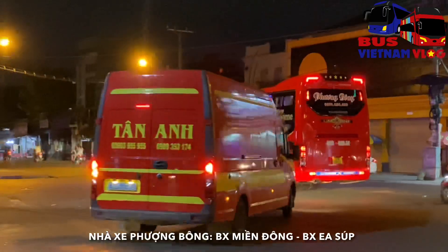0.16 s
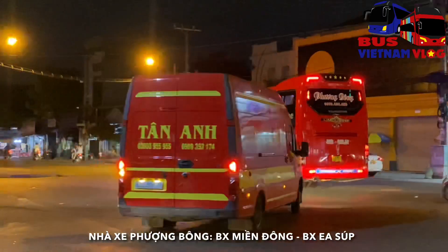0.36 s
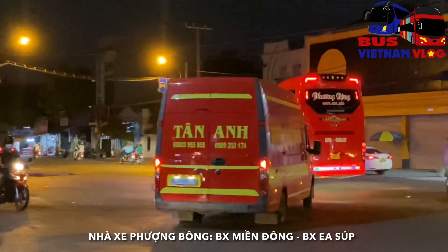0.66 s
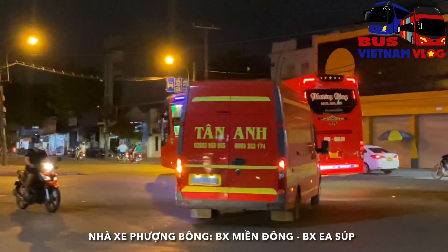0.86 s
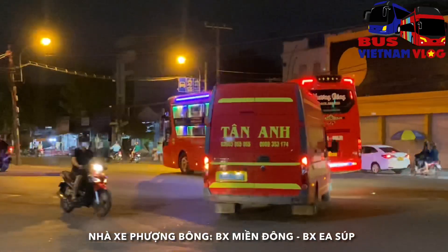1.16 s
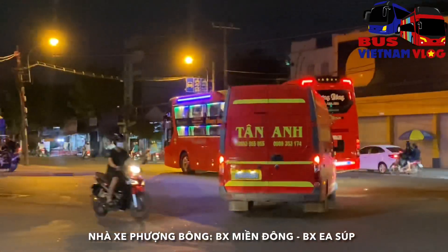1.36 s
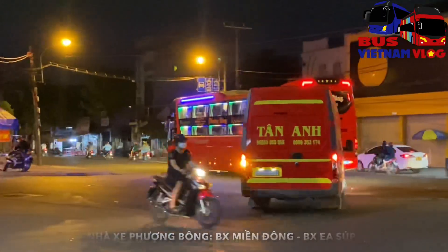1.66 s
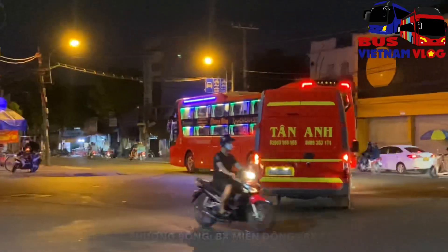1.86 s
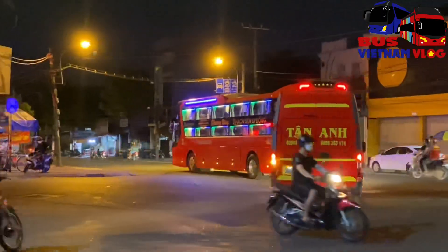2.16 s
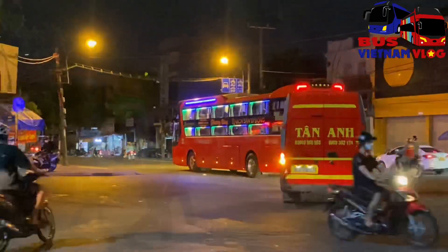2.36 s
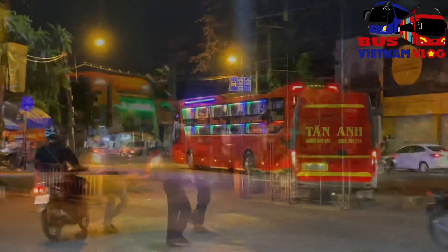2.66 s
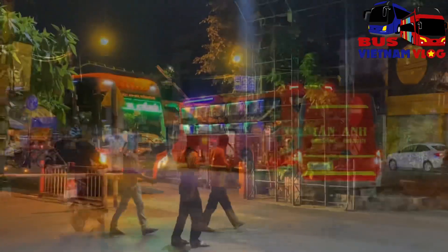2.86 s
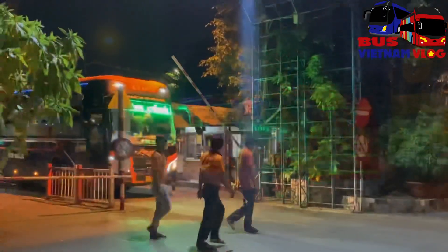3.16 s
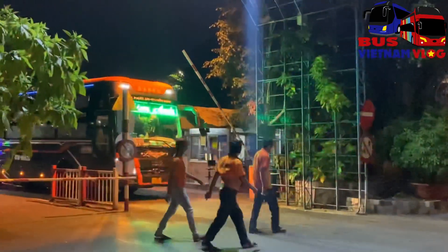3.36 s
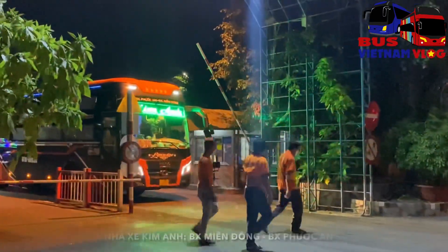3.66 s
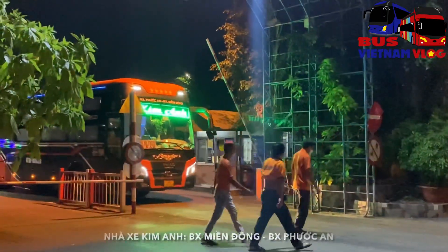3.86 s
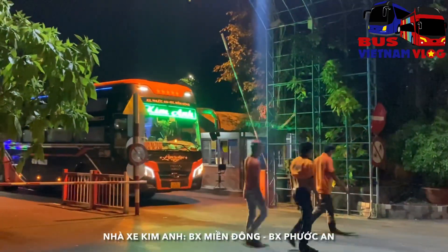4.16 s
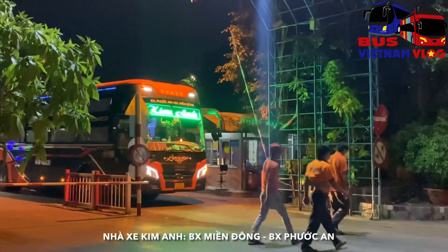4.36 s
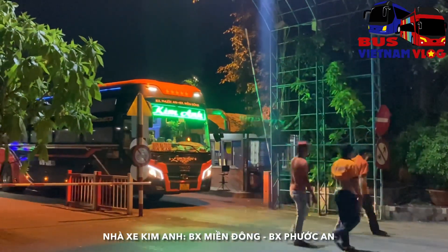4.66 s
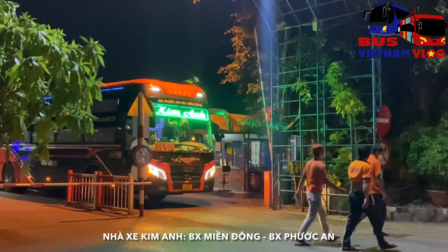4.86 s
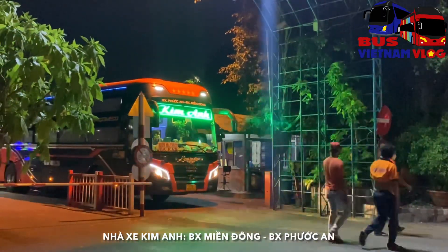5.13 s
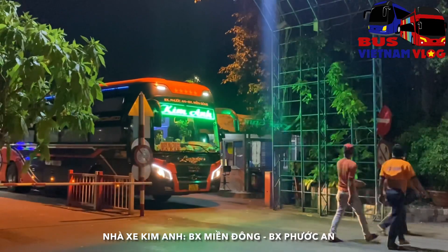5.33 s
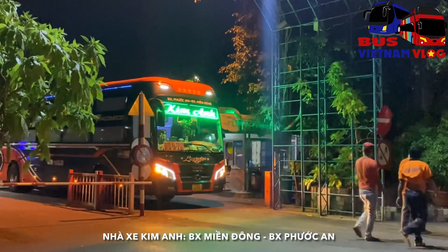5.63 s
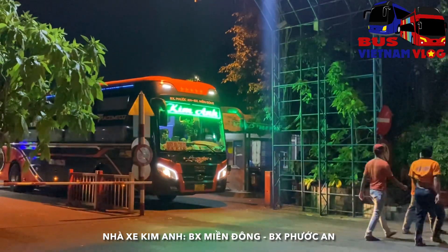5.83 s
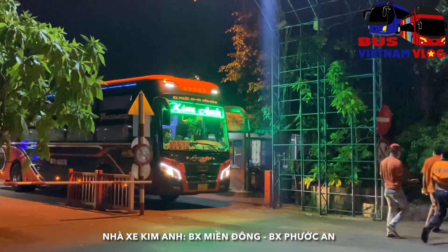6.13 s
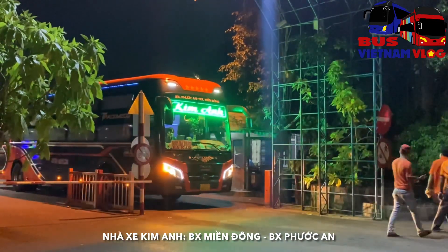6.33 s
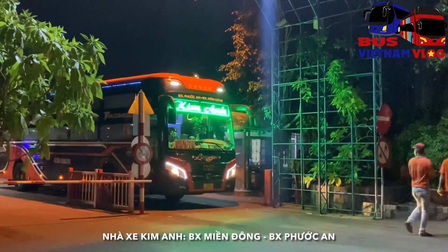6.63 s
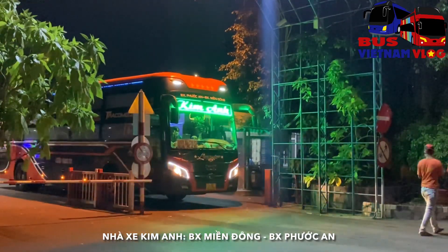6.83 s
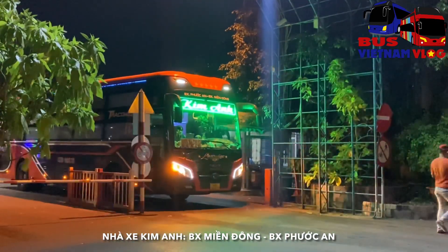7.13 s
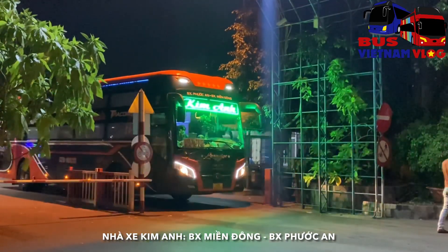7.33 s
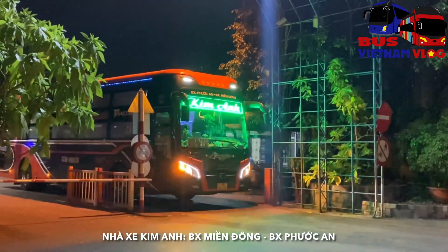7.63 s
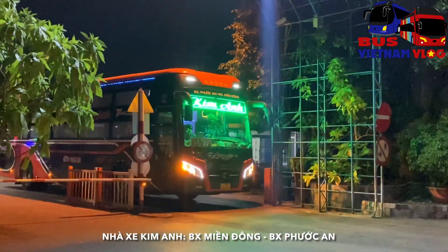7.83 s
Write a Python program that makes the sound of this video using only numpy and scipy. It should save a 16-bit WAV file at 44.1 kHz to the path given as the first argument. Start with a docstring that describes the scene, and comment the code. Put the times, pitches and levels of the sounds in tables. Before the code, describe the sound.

On a street by a bus station, a diesel van pulls away and a motorbike putters past over steady traffic rumble, with faint squeaks, sharp rattles and distant horn toots. The sound blends into a duller yard, where soft puffs of air escape and a coach creeps out, pulling, easing off and pulling again while another idles. Near the end, two shrill motorbike horns beep quickly with a slight echo.

```python
"""A bus station at night. In the street a diesel van crawls off and a motorbike putters past; the scene
fades to the gate, where a coach creeps out while another idles. Each engine hums because it fires many
times a second, and traffic rumbles, roars and hisses in both places. Horns toot far off, with a few ticks,
squeaks, whines and puffs of air in between. Near the end two shrill motorbike horns beep as their steel
discs buzz, and the house fronts echo them."""
import sys
import numpy as np
from scipy import signal
from scipy.fft import rfft, irfft, next_fast_len
from scipy.io import wavfile
from scipy.ndimage import uniform_filter1d

SR = 44100
rng = np.random.default_rng(int(sys.argv[2]) if len(sys.argv) > 2 else 0)


def generate_wav(signal):
    """Clip the signal to [-1, 1] and save it as 16-bit WAV at the path in sys.argv[1]."""
    frames = np.transpose(np.atleast_2d(signal))
    scaled = np.clip(frames, -1, 1) * 32767
    pcm = np.round(scaled).astype(np.int16)
    wavfile.write(sys.argv[1], SR, pcm)


N = 352359


# The van holds its speed. Each row: time in seconds, firings per second, level in dB.
VAN_DRIVE = [(0, 33.7, -25.5), (.55, 32.3, -24.5), (1.05, 32.8, -21.5), (1.55, 33.5, -27), (2.0, 32.4, -39),
             (2.5, 32.6, -24)]
# Its exhaust tones. Each row: multiple of the firing rate, dB at first, dB once it has turned.
VAN_TONES = [(2, -4, -2.5), (3, -7, 0.5), (4, -7, -7.5), (5, -3.5, -6), (6, 1, -12.5), (8, -11.5, -14),
             (10, -14.5, -16)]

def van():
    """A diesel whose note dulls as it swings away. Gives the sound and the running count of firings."""
    firing_hz, level_db = curves(VAN_DRIVE)
    tones = changing(VAN_TONES, span_s=(0.52, 0.94))
    note, firings = exhaust(firing_hz, tones, speed_waver=0.0036, uneven_db=2)
    clatter = amp(-38.5) * hump(0, 0.39) * engine_bay(firings, fall_db=5, scatter_db=0)
    return amp(level_db) * note + clatter, firings


# The coach pulls, eases off and pulls again. Each row: time in seconds, firings per second, level in dB.
COACH_DRIVE = [(3.05, 42.4, -36), (3.3, 44, -22), (3.6, 45.3, -31.5), (4.05, 44.2, -32), (4.35, 51, -31.5),
               (4.7, 34.4, -35), (5.2, 30.5, -27), (5.8, 34.2, -29), (6.8, 33, -33), (7.2, 40, -30),
               (7.55, 40.8, -31), (8, 40.5, -25)]
# Its exhaust tones. Each row: multiple of the firing rate, dB at the first pull, dB after easing off.
COACH_TONES = [(1, -21, -9), (2, 1.5, -0.5), (3, -16, -7), (4, 0, -11), (5, -15, -16), (9, -15, -25),
               (12, -17.5, -25), (16, -19, -29)]

def coach():
    """A diesel whose clatter swells as it clears the gate. Gives the sound and the count of firings."""
    firing_hz, level_db = curves(COACH_DRIVE)
    tones = changing(COACH_TONES, span_s=(4.25, 4.8))
    note, firings = exhaust(firing_hz, tones, speed_waver=0.00491, uneven_db=1.3)
    clatter = amp(-44.5) * hump(5.33, 0.5) * engine_bay(firings, fall_db=7, scatter_db=1.5)
    return amp(level_db) * note + clatter, firings


# The tone colour of diesel clatter. Each row: frequency in Hz, relative level in dB.
BAY_COLOUR = [(900, 0), (1400, -1.5), (1900, 0.5), (2500, -6.5), (3500, -15)]

def engine_bay(firings, fall_db, scatter_db):
    """A diesel engine knocks once at every firing."""
    return puffing(firings, BAY_COLOUR, fall_db, scatter_db)


# The motorbike goes past. Each row: time in seconds, firings per second, level of its note in dB.
BIKE_DRIVE = [(.6, 22.6, -49), (1.3, 22.8, -23), (1.8, 24, -25), (2.2, 23.95, -25.5), (2.6, 24.6, -25)]
# Its exhaust tones. Each row: multiple of the firing rate, relative level in dB.
BIKE_TONES = [(4, -13), (5, -1), (6, 0), (7, -8.5), (9, -11.5), (14, -13.5), (16, -17), (20, -20.5),
              (25, -20)]
# The bright rasp and low thump of each firing. Each row: frequency in Hz, relative level in dB.
BIKE_RASP = [(1800, 1), (2400, 2.5), (3300, -1), (4200, -8), (5300, -5.5), (6500, -12.5), (10000, -19),
             (15000, -26)]
BIKE_THUMP = [(70, -14), (130, -2), (180, -3.5), (300, -7), (600, -15.5)]

def motorbike():
    """One cylinder putters; while it is near, each firing also thumps and rasps."""
    firing_hz, level_db = curves(BIKE_DRIVE)
    note, firings = exhaust(firing_hz, BIKE_TONES, speed_waver=0.00505, uneven_db=2)
    rasp = amp(-40) * puffing(firings, BIKE_RASP, fall_db=8.5, scatter_db=1)
    thump = amp(-32) * puffing(firings, BIKE_THUMP, fall_db=7, scatter_db=5)
    nearness = hump(centre_s=1.78, half_width_s=0.63)
    return amp(level_db) * note + nearness * (rasp + thump)


# The parked coach's exhaust tones. Each row: multiple of the firing rate, relative level in dB.
IDLE_TONES = [(2, 0), (5, -6)]

def parked_coach():
    """A diesel idles at the gate, its speed wandering a little."""
    note, _ = exhaust(firing_hz=30.92, tones=IDLE_TONES, speed_waver=0.01195, uneven_db=3)
    return amp(-34) * note


def exhaust(firing_hz, tones, speed_waver, uneven_db):
    """Repeated firings make tones at multiples of their rate. Gives the note and the count of firings."""
    firings = np.cumsum(firing_hz * (1 + speed_waver * wobble(9))) / SR
    note = sum(amp(db + uneven_db * wobble(6)) * sine(round(k) * firings) for k, db in tones)
    return unit(note), firings


def puffing(firings, colour, fall_db, scatter_db):
    """Noise jumps at each firing and falls until the next; scatter_db makes the puffs differ in size."""
    size_db = scatter_db * rng.standard_normal(1000)[firings.astype(int)]
    return unit(amp(size_db - fall_db * (firings % 1)) * hiss(colour))


# The nearer horn's two discs. Each row: pitch in Hz, relative level in dB.
NEAR_PITCHES = [(479.8, 0), (472.6, -9)]
# The tones of each disc. Each row: multiple of its pitch, relative level in dB.
NEAR_TONES = [(6, -9), (7, 0), (8, -0.5), (9, -21.5), (10, -25), (11, -27), (19, -28), (20, -19), (21, -27)]
# Its beeps. Each row: start, length and rise time in seconds, level in dB, extra swell in dB.
NEAR_BEEPS = [(7.103, 0.17, 0.021, -38.5, 0), (7.388, 0.2, 0.035, -38, 7.5)]

def near_horn():
    """Two steel discs, slightly out of tune with each other, buzz together."""
    tones = [(round(k) * hz, disc_db + db) for hz, disc_db in NEAR_PITCHES for k, db in NEAR_TONES]
    return horn(NEAR_BEEPS, tones, waver=0.0011, flutter_db=3.2, rasp_db=-20)


# The farther horn's tones. Each row: frequency in Hz, relative level in dB.
FAR_TONES = [(2805, -53), (3570, -57), (3965, -66)]
# Its beeps. Each row: start, length and rise time in seconds, level in dB, extra swell in dB.
FAR_BEEPS = [(7.44, .1, .02, -53, 2), (7.66, 0.15, .02, -46.5, 9), (7.875, 0.11, 0.019, -49, 9.5)]

def far_horn():
    """A fainter, raspier horn beeps three times."""
    return horn(FAR_BEEPS, FAR_TONES, waver=0.0045, flutter_db=3.5, rasp_db=-1.5)


# The rattle of a horn's disc. Each row: frequency in Hz, relative level in dB.
HORN_RASP = [(2400, -20), (2800, 5), (3200, -7), (3600, -3), (4050, -5), (4400, -19), (6000, -28)]

def horn(beeps, tones, waver, flutter_db, rasp_db):
    """A steel disc buzzes: its tones waver together and flutter in the moving reflections."""
    level = 0
    for start, length, attack, db, swell_db in beeps:
        swell = hump(start + 0.6 * length, 0.1 * length)
        level += amp(db + swell_db * swell) * pressed(start, length, attack, fall_db_per_s=99)
    time = wavering_clock(waver, rate=70)
    buzz = sum(amp(db + flutter_db * wobble(45)) * sine(hz * time) for hz, db in tones)
    return level * (unit(buzz) + amp(rasp_db) * hiss(HORN_RASP))


# Toots down the road. Each row: start in seconds, length in seconds, pitch in Hz, level in dB.
TOOTS = [(1.514, 0.19, 439, -37.5), (2.02, 0.19, 471, -40), (3.353, 0.1716, 441, -41.5)]
# The tones in a toot. Each row: multiple of the pitch, relative level in dB.
TOOT_TONES = [(2, 4.5), (3, -7.5), (4, -22), (5, -12)]

def toots():
    """Lower horns sound far away, slightly unsteady in pitch."""
    time = wavering_clock(0.0077, rate=50)
    sound = 0
    for start, length, hz, level_db in TOOTS:
        note = unit(sum(amp(db) * sine(round(k) * hz * time) for k, db in TOOT_TONES))
        sound += amp(level_db) * held(start, start + length, edge_s=0.028) * note
    return sound


# Snaps and rattles. Each row: start in seconds, length in seconds, level in dB.
TICKS = [(1.37, .012, -39), (1.422, 0.011, -42), (1.949, 0.015, -37), (1.963, 0.013, -37),
         (2.108, 0.13, -46), (2.333, 0.0093, -28), (2.43, 0.065, -47), (4.51, 0.062, -51)]
# Their tone colour. Each row: frequency in Hz, relative level in dB.
TICK_COLOUR = [(2500, -14), (4500, -13), (6000, 5), (7300, 4), (10500, 1.5), (14000, -2), (15500, -5)]

def ticks():
    """The vehicles rattle in short, bright bursts that do not ring."""
    level = sum(amp(db) * held(start, start + length / 2, length / 2) for start, length, db in TICKS)
    return level * hiss(TICK_COLOUR)


# Brakes and springs squeak. Each row: start in seconds, length in seconds, pitch in Hz, level in dB.
SQUEAKS = [(.73, 0.067, 3830, -51), (1.315, 0.045, 5300, -51)]

def squeaks():
    """Slipping metal makes short, rough, high notes."""
    time = wavering_clock(0.0062, rate=330)
    sound = 0
    for start, length, hz, db in SQUEAKS:
        level = amp(db) * pressed(start, length, attack_s=0.0092, fall_db_per_s=400)
        sound += level * unit(np.sin(2 * np.pi * hz * time))
    return sound


# Faint whines, and one far toot whose two tones start at 5.24 and 5.28 s with 698 Hz and 1833 Hz. Each row:
# start and length in seconds, pitch in Hz, glide in Hz per second, level in dB.
WHINES = [(3.0, 0.32, 1560, -58, -48), (3.929, .36, 1516, 91, -48), (4.852, 0.2, 1501, 248.5, -50),
          (5.241, 0.27, 698, 70, -45), (5.284, 0.13, 1833, -260, -45), (4.7, .4, 3180, 1, -62)]

def whines():
    """Thin, unsteady tones come and go over the coach's engine; at 5.24 s two of them sound together as a far
    horn's toot."""
    waver = 1 + 0.00907 * wobble(90)
    sound = 0
    for start, length, hz, glide, db in WHINES:
        pitch_hz = (hz + glide * (clock() - start)) * waver
        tone = unit(np.sin(2 * np.pi * np.cumsum(pitch_hz) / SR))
        sound += amp(db) * pressed(start, length, attack_s=0.082, fall_db_per_s=62) * tone
    return sound


# Soft puffs at the gate. Each row: start in seconds, length in seconds, level in dB.
PUFFS = [(3.084, 0.19, -51), (3.39, .07, -53)]
# Their tone colour. Each row: frequency in Hz, relative level in dB.
AIR_COLOUR = [(3000, -30), (6500, -1), (10000, -2), (13500, 0), (15300, -3)]

def air_valve():
    """A valve lets off a little compressed air."""
    level = sum(amp(db) * pressed(start, length, attack_s=0.057, fall_db_per_s=130)
                for start, length, db in PUFFS)
    return level * hiss(AIR_COLOUR)


# The street's low and high noise, and the fizz that both places share.
# Each row: frequency in Hz, relative level in dB.
STREET_LOW = [(12, -61), (20, -31), (34, -17), (47, -8), (59, 0.5), (81, -8), (125, -2.5), (155, -2),
              (200, -7.5), (282, -11), (323, -9.5), (512, -17.5), (612, -21.5), (700, -43), (910, -53),
              (1540, -120)]
STREET_HIGH = [(260, -29), (450, 9.5), (520, -3.5), (623, -1.5), (746, -8), (890, -4), (1190, -13),
               (1480, -10.5), (1730, -12.5), (2210, -9.5), (4380, -19), (5250, -20.5), (7270, -23),
               (8000, -19.5), (10400, -62), (17600, -120)]
FIZZ = [(5500, -30), (7500, -1), (8600, 7), (10000, 0), (12000, -7), (13800, -9), (15300, -12)]
# How wide the street sounds. Each row: frequency in Hz, level of the sides against the middle in dB.
STREET_WIDTH = [(60, -23), (100, -15.5), (200, -13), (450, -8.5), (750, -7.5), (1400, -2.5), (2000, -8.5),
                (2700, -38), (4200, -45), (6400, -52)]

def street_traffic(firings):
    """Five bands of traffic noise; all but the lowest pulse with the van's firings."""
    beat = np.cos(2 * np.pi * firings)
    load_db = 2.5 * hump(1.33, 0.67)  # the van takes the load
    leaving_db = -0.65 * clock()  # road noise fades as the vehicles leave
    rumble = amp(-24.5 + 0.36 * load_db) * even(rush(STREET_LOW, STREET_WIDTH, 28, 111))
    drone = amp(-26 + load_db + beat) * rush(STREET_LOW, STREET_WIDTH, 116, 563)
    roar = patchy(rush(STREET_HIGH, STREET_WIDTH, 585, 2030), depth_db=1.06)
    roar *= amp(-31.5 + leaving_db + 0.66 * beat)
    clatter = rush(STREET_HIGH, STREET_WIDTH, 1860, 7700)
    clatter *= amp(-37.5 + leaving_db + 0.49 * beat + 0.87 * wobble(150))
    fizz = rush(FIZZ, [(8000, -7.5)], 9200, 18000)
    fizz *= amp(-50.5 + 0.34 * load_db + 0.61 * beat + 0.72 * wobble(60))
    return rumble + drone + roar + clatter + fizz


# The gate's low and high noise. Each row: frequency in Hz, relative level in dB.
GATE_LOW = [(12, -47), (20, -32), (48, -2), (70, 2), (90, -1.5), (125, -11), (156, -8), (184, -14.5),
            (210, -13), (309, -19), (338, -15.5), (364, -19), (520, -21), (631, -31.5), (700, -22),
            (910, -53), (1540, -120)]
GATE_HIGH = [(260, -31), (450, 4), (526, -0.5), (623, -7), (720, -5), (802, -8.5), (852, -8), (1500, -9),
             (1670, -12), (2370, -15.5), (3530, -21.5), (6290, -29.5), (8000, -33.5), (10400, -89),
             (17600, -120)]
# How wide the gate sounds. Each row: frequency in Hz, level of the sides against the middle in dB.
GATE_WIDTH = [(60, -28), (110, -17), (180, -12.5), (320, -9), (600, -4), (950, -0.5), (1450, -2),
              (2000, -2), (2800, -6), (5500, -3.5)]
# The traffic in the yard slowly draws away. Each row: time in seconds, change of level in dB.
YARD_LOUDNESS = [(3.0, 0.5), (3.35, 2.4), (4.3, 0.13), (5.4, 0.3), (6.7, -1.3), (8, -.5)]

def gate_traffic(firings, firings_per_turn):
    """The duller noise of the yard; its low end throbs once for each turn of the coach's engine shaft."""
    beat = np.cos(2 * np.pi * firings)
    throb = np.cos(2 * np.pi * firings / firings_per_turn)
    yard_db, = curves(YARD_LOUDNESS)
    rumble = amp(-25 + 1.4 * throb) * even(rush(GATE_LOW, GATE_WIDTH, 31.1, 123))
    drone = amp(-27 + 0.78 * yard_db + 0.71 * throb) * rush(GATE_LOW, GATE_WIDTH, 113.4, 534)
    roar = amp(-33.5 + yard_db) * patchy(rush(GATE_HIGH, GATE_WIDTH, 542, 1870), depth_db=1.96)
    clatter = rush(GATE_HIGH, GATE_WIDTH, 1994, 9700)
    clatter *= amp(-42 + yard_db + 0.4 * beat + 0.68 * wobble(25))
    fizz = amp(-56 + yard_db + 0.96 * wobble(25)) * rush(FIZZ, [(8000, -36)], 9200, 15400)
    return rumble + drone + roar + clatter + fizz


# The echo of the house fronts. Each row: frequency in Hz, seconds it takes to fade by 60 dB.
ECHO_TIMES = [(200, 0.36), (3000, 0.12), (10000, 0.035)]

def house_echo(x, echo_db):
    """A sound in the middle plus its scattered echo from the house fronts; the treble dies first."""
    hz, t, spectrum = signal.stft(rng.standard_normal((2, SR // 2)), SR, nperseg=256)
    decay = amp(-60 * t / along(ECHO_TIMES, hz)[:, None])
    tail = signal.istft(spectrum * decay, SR, nperseg=256)[1]
    echo = signal.fftconvolve(x[None], tail / np.linalg.norm(tail[0]), axes=1)[:, :N]
    return (x + amp(echo_db) * echo) / np.hypot(1, amp(echo_db))


def patchy(x, depth_db):
    """Many far sources come and go, each in its own narrow band."""
    spectrum = signal.stft(x, nperseg=2048)[2]
    patches = uniform_filter1d(rng.standard_normal(spectrum.shape[1:]), size=4, axis=0)
    patches = unit(uniform_filter1d(patches, size=7, axis=1))
    return unit(signal.istft(spectrum * amp(depth_db * patches), nperseg=2048)[1][:, :N])


def even(x, window_s=0.2, strength=0.68):
    """Soften the chance swells of a noise, like the mixed drone of many steady engines."""
    power = signal.fftconvolve(np.mean(x ** 2, axis=0), np.hanning(int(window_s * SR)), 'same')
    return unit(x / (np.abs(power) + 1e-9) ** (strength / 2))


def rush(colour, width, lo_hz, hi_hz):
    """One band of stereo noise."""
    gain = lambda hz: amp(along(colour, hz)) * band(hz, lo_hz, hi_hz)
    mid = filtered(rng.standard_normal(N), gain)
    side = filtered(rng.standard_normal(N), lambda hz: gain(hz) * amp(along(width, hz)))
    return unit(np.array([mid + side, mid - side]))


def hiss(colour):
    """Mono noise with the given tone colour."""
    gain = lambda hz: amp(along(colour, hz)) * band(hz, colour[0][0], colour[-1][0])
    return unit(filtered(rng.standard_normal(N), gain))


def band(hz, lo_hz, hi_hz):
    """A gain that drops steeply outside two frequencies."""
    return 1 / np.sqrt((1 + (lo_hz / (hz + 1)) ** 12) * (1 + (hz / hi_hz) ** 12))


def filtered(x, response):
    """Multiply each frequency in x by response(hz)."""
    size = next_fast_len(N + 8192)
    return irfft(rfft(x, size) * response(np.fft.rfftfreq(size, 1 / SR)), size)[..., :N]


def amp(db):
    """Decibels to gain."""
    return 10 ** (np.asarray(db) / 20)


def unit(x):
    """Scale to an average power of 1."""
    return x / np.sqrt(np.mean(x ** 2) + 1e-20)


def sine(cycles):
    """A pure tone that starts at a random point in its cycle."""
    return np.sin(2 * np.pi * (cycles + rng.random()))


def clock():
    """The time of every sample in seconds."""
    return np.arange(N) / SR


def wavering_clock(depth, rate):
    """Time that runs a little fast and slow, to make a pitch waver."""
    return np.cumsum(1 + depth * wobble(rate)) / SR


def wobble(rate):
    """A smooth curve through rate random values a second."""
    knots = rng.standard_normal(int(N * rate / SR) + 4)
    smooth = signal.resample(knots, 8 * len(knots))
    return np.interp(clock() * rate, np.arange(len(smooth)) / 8, smooth)


def along(points, hz):
    """Read between (Hz, value) points on a log frequency scale."""
    frequencies, values = np.transpose(points)
    return np.interp(np.log(hz + 1), np.log(frequencies + 1), values)


def curves(rows):
    """One value per sample for each column after the time."""
    times, *columns = np.transpose(rows)
    return [np.interp(clock(), times, column) for column in columns]


def changing(tones, span_s):
    """Slide each tone from its first level to its second."""
    return [(k, np.interp(clock(), span_s, [first, second])) for k, first, second in tones]


def hump(centre_s, half_width_s):
    """A smooth rise and fall, 1 at its centre."""
    return np.exp(-0.5 * ((clock() - centre_s) / half_width_s) ** 2)


def held(start, end, edge_s):
    """Slope up to 1 from the start, and back down from the end."""
    return np.clip((clock() - start) / edge_s, 0, 1) * np.clip((end - clock()) / edge_s + 1, 0, 1)


def pressed(start, length, attack_s, fall_db_per_s):
    """Rise, hold, then die away."""
    age = clock() - start
    return np.clip(age / attack_s, 0, 1) * amp(-fall_db_per_s * np.maximum(age - length, 0))


def placed(x, direction):
    """Turn a stereo sound to one side with a gap in level and timing between the ears."""
    hz, lean_db, lead = np.transpose(direction)
    ears = np.array([[0.5], [-0.5]])
    gain = lambda f: amp(ears * along(np.c_[hz, lean_db], f))
    shift = lambda f: np.exp(1j * ears * along(np.c_[hz, lead], f))
    return filtered(x, lambda f: gain(f) * shift(f))


# The street leans left and the gate leans right.
# Each row: frequency in Hz, how much louder the left is in dB, how far the left is ahead in radians.
STREET_DIRECTION = [(120, 0, -0.014), (450, 0.5, 0.17), (750, 2.3, 0.23), (1100, 4.5, -0.05),
                    (1500, 4.5, -0.78), (2100, -1, 0)]
GATE_DIRECTION = [(60, 0, -.05), (110, 1, -0.26), (180, -1.2, -0.29), (320, -3.1, -0.39), (600, 0, -0.48),
                  (930, -2.4, -1.76), (1450, -1.4, -0.89), (2000, 1.5, -0.45), (2800, 0.5, 0.42),
                  (5500, 1.2, 0.75), (7500, -0.5, -0.24)]

def scene():
    """The street fades into the gate; horns and small noises echo over both."""
    van_sound, van_firings = van()
    street = van_sound + motorbike() + street_traffic(van_firings)
    coach_sound, coach_firings = coach()
    gate = coach_sound + parked_coach() + gate_traffic(coach_firings, firings_per_turn=3)
    fade_out = np.cos(np.interp(clock(), (2.26, 3.12), (0, np.pi / 2)))
    fade_in = np.sin(np.interp(clock(), (2.41, 3.34), (0, np.pi / 2)))
    traffic = fade_out * placed(street, STREET_DIRECTION) + fade_in * placed(gate, GATE_DIRECTION)
    close = house_echo(near_horn() + ticks() + squeaks() + air_valve(), echo_db=-8)
    distant = house_echo(far_horn() + toots() + whines(), echo_db=-5.5)
    return traffic + close + distant


def record(dry):
    """In the high treble the left channel lags behind the right, and the very top is cut off."""
    lag_from_hz, lag_s, top_hz = 6850, 0.000283, 15300
    ears = np.array([[-1], [1]])
    skewed = filtered(dry, lambda hz: np.exp(1j * np.pi * lag_s * np.maximum(hz - lag_from_hz, 0) * ears))
    return filtered(skewed, lambda hz: hz < top_hz)


dry = scene()
out = record(dry)
generate_wav(out)
```